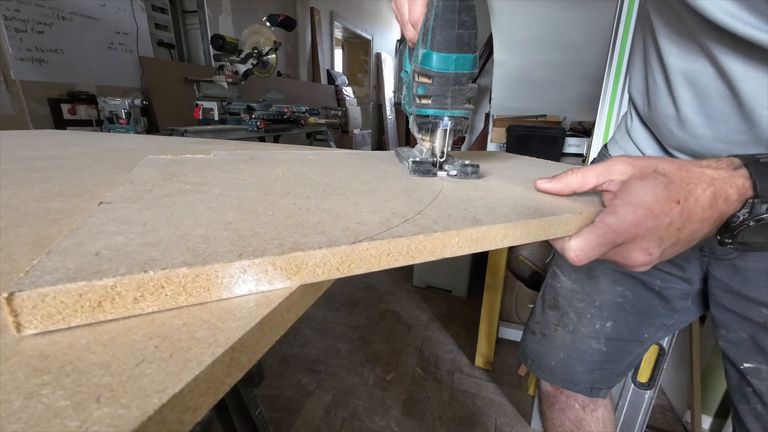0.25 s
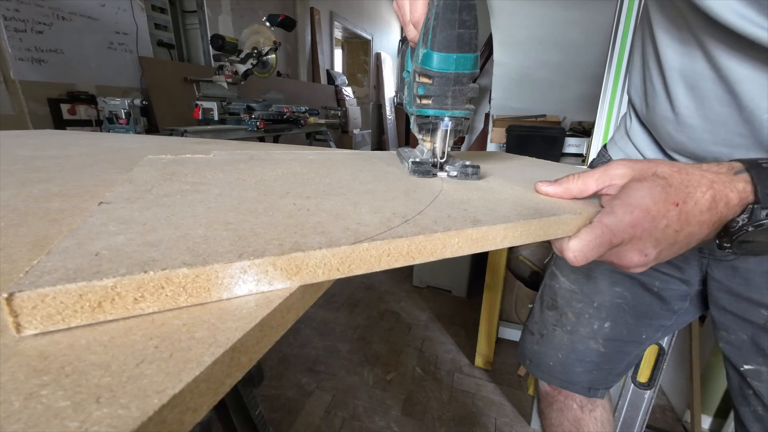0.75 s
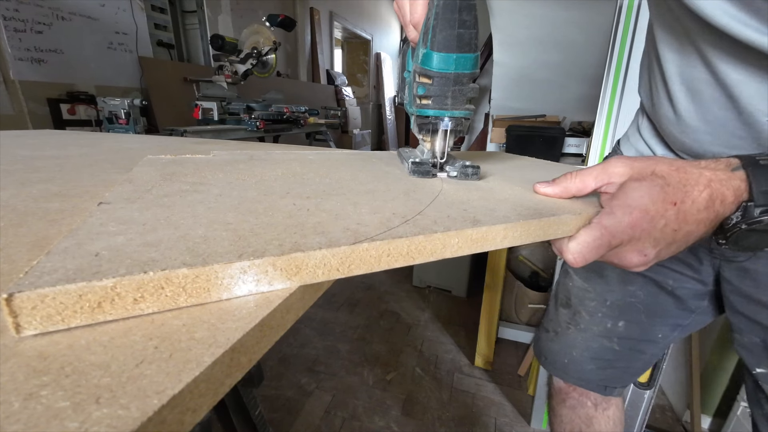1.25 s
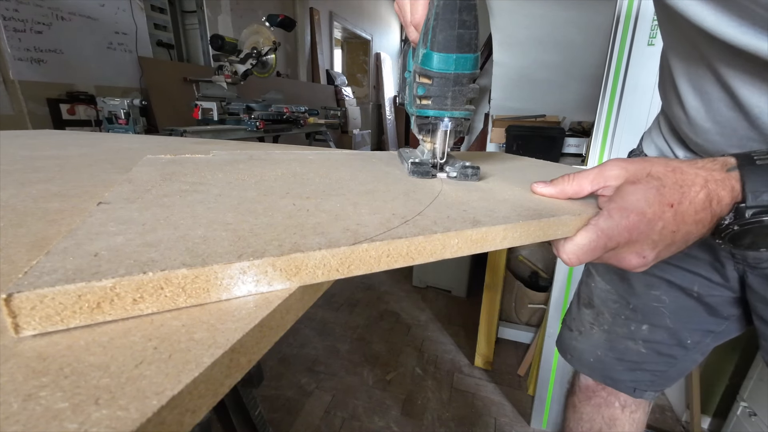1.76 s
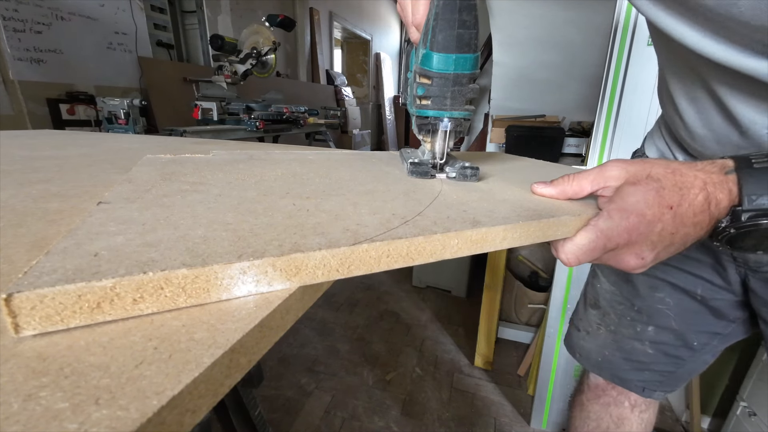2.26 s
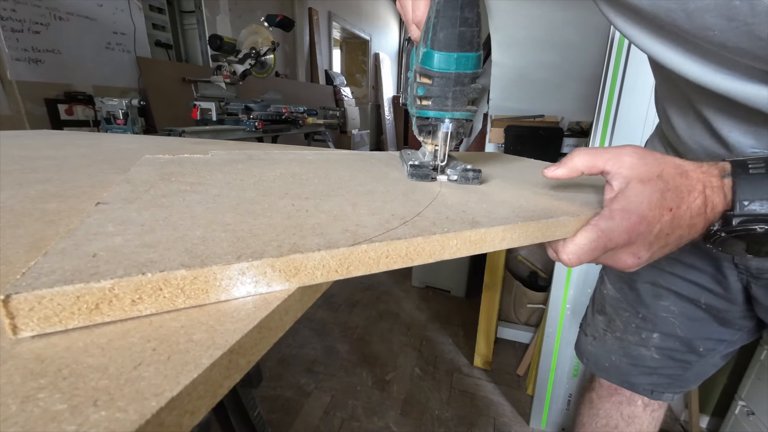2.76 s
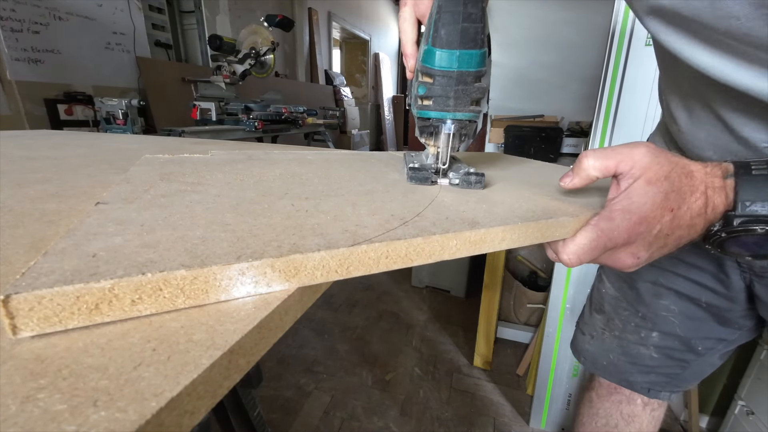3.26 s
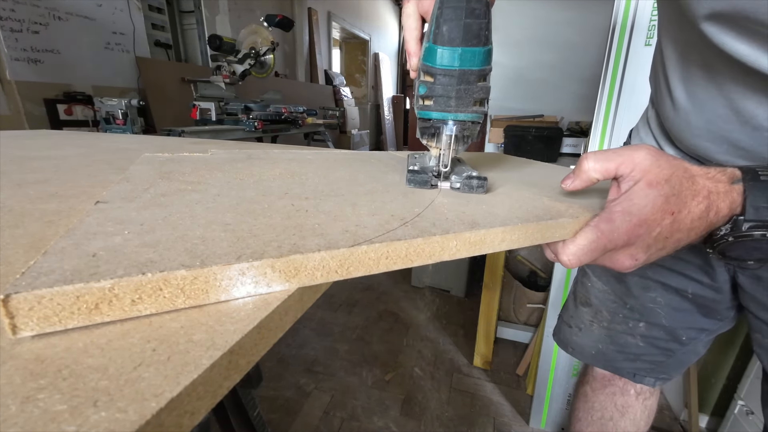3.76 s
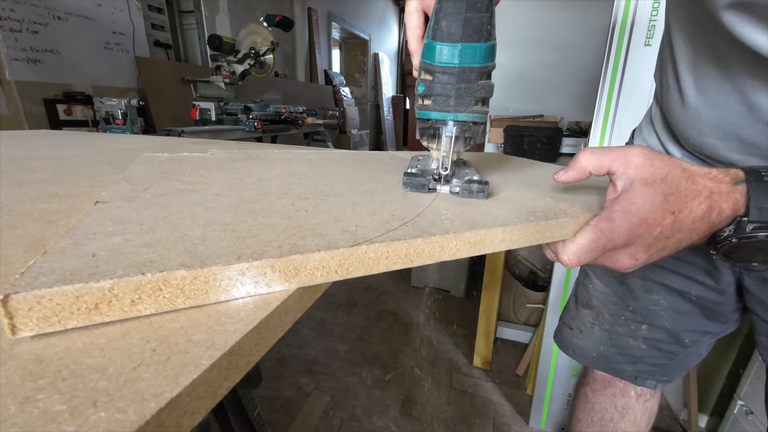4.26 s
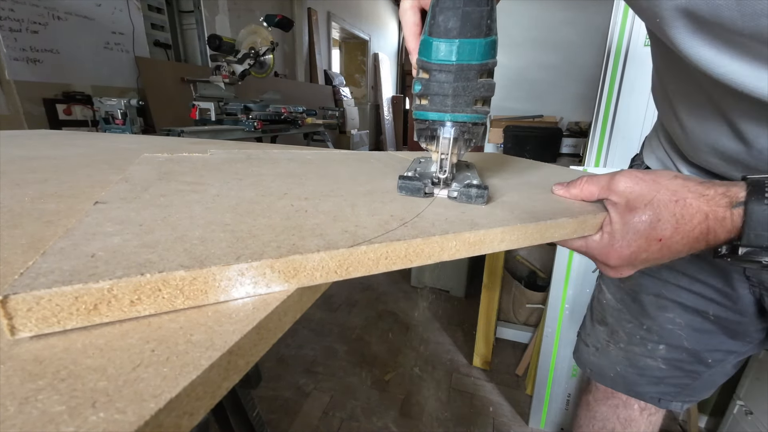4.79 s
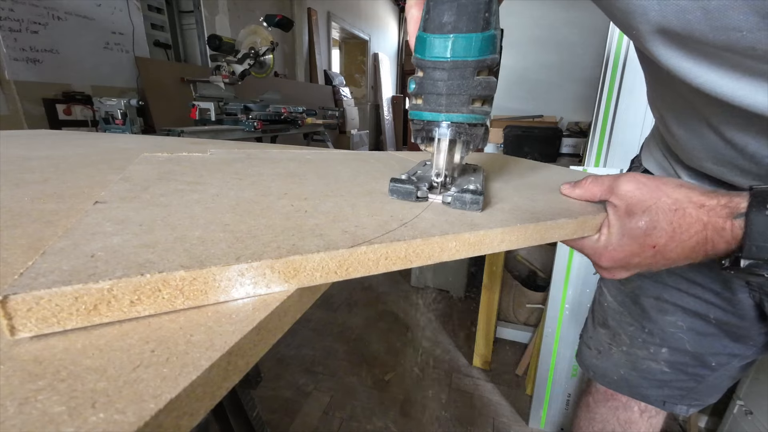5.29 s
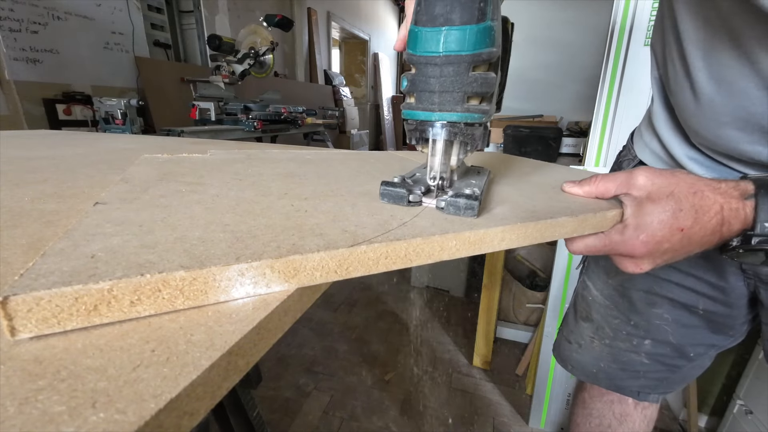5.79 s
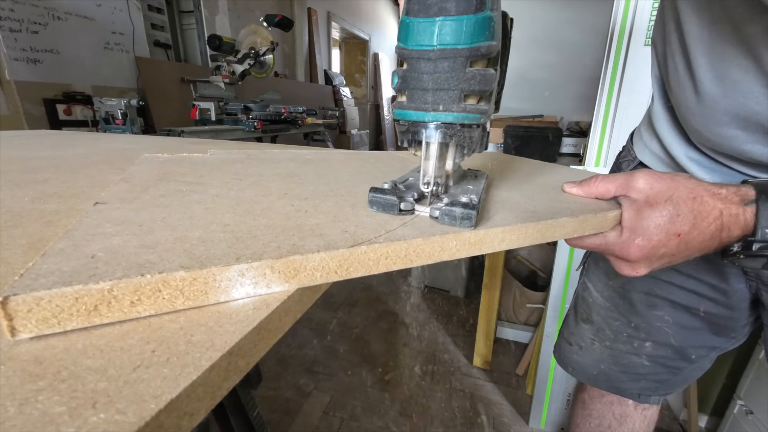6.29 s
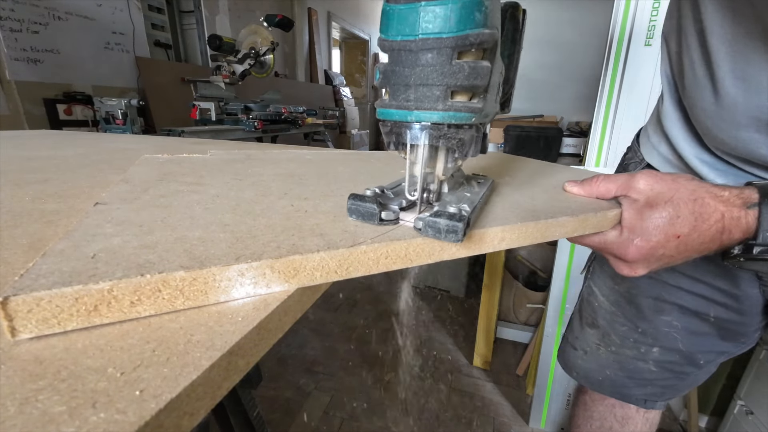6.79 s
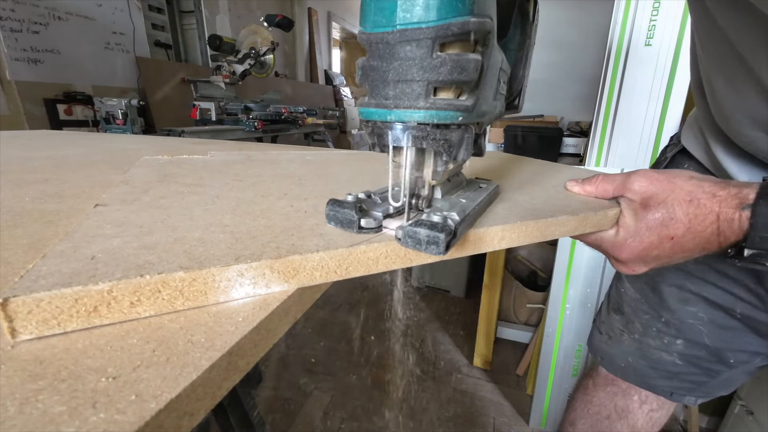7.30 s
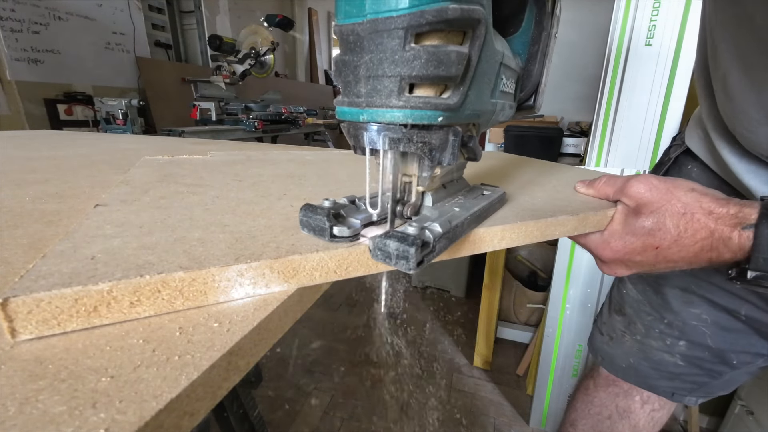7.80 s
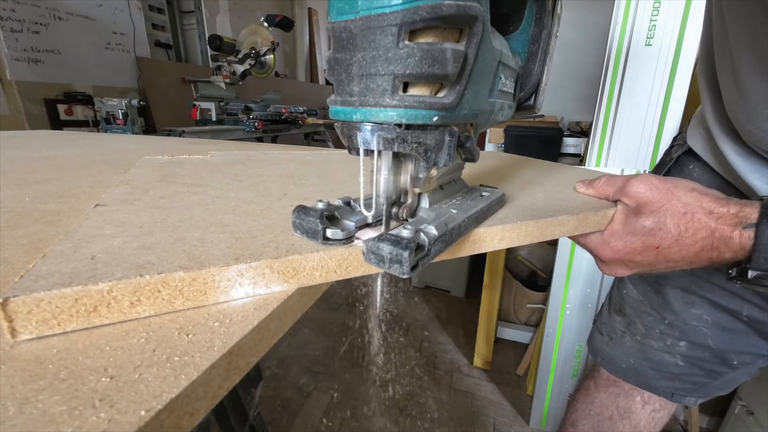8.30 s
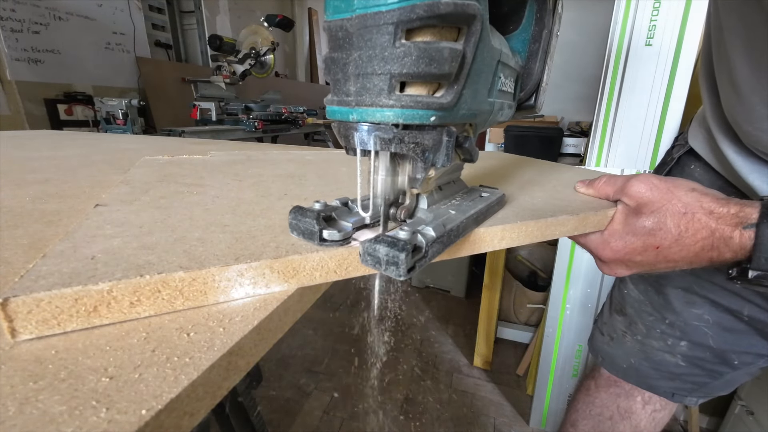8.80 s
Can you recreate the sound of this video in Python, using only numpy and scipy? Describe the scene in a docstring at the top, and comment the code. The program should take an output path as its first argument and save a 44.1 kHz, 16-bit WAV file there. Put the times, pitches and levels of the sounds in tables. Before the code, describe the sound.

Close-up power saw cutting board: trigger click, loud rasping chatter, a fast-motion whining stretch about three octaves higher, then natural-speed rattling again.

```python
"""A cordless jigsaw cuts a curve through thick chipboard in a workshop, close by.
A hand clicks the trigger; each stroke then shakes the board (hum), knocks in the drive and rasps in the kerf (noise).
The middle of the cut passes in fast motion, about eight times as fast: a whine of sines over hiss, with soft moans.
Until the edge, single overtones swell and fade as the saw travels over the board.
At the edge the saw is back at its natural pace and its overtones hold nearly steady."""
import sys
import numpy as np
from scipy import signal
from scipy.fft import rfft, irfft, next_fast_len
from scipy.io import wavfile
from scipy.ndimage import uniform_filter1d, map_coordinates

SR = 44100
rng = np.random.default_rng(int(sys.argv[2]) if len(sys.argv) > 2 else 0)


def master(y):
    """Save y as 16-bit WAV."""
    cut = np.clip(np.atleast_2d(y).T, -1, 1)
    pcm = np.round(cut * 32767)  # scale
    wavfile.write(sys.argv[1], SR, pcm.astype(np.int16))


N = 399105

# stretches of the cut: (start_s, end_s)
START_S, FAST_S, EDGE_S = (.149, 2.302), (2.298, 7.902), (7.9, 9.06)


def sawing(span_s, speed, force, steady, knocks, tone, rise_s, overtones_db, clatter_db, rumble_db,
           rasp_db, scatter_db):
    """The saw at its natural pace: hum of the shaken board, clatter of the strokes and a low rumble."""
    # rumble spectrum: freq_hz, relative density_db
    rumble_tone = [(15, -5), (150, -2), (400, -3), (900, -17), (4000, -50)]
    # resonances of housing, shoe and blade: freq_hz, width_hz, lift_db
    saw_modes = [(2210, 140, 1), (3580, 400, 2.5), (5510, 1120, 6), (7980, 1200, 2.5), (10040, 750, 4.5),
                 (11270, 1270, 6), (14800, 1200, 3.5)]
    # stereo width: freq_hz, nominal side_minus_mid_db
    width = [(60, -21), (110, -13), (200, -30), (600, -21.5), (2500, -81.5), (8100, -9.5), (15000, -6.5)]
    t = times(span_s)
    turns = np.cumsum(follow(speed, t)[0]) / SR + .005 * drift(t, 25)
    shake_db, cut_db = follow(force, t)
    board = hum(t, turns, steady, waver_db=1.0, waver_rate_hz=7)

    # an even comb of weak multiples between the strong ones
    strong = [round(order) for order, _ in steady]
    weak = [(order, 0) for order in range(6, 33) if order not in strong]
    comb = stack(t, turns, weak, waver_db=2.5, waver_rate_hz=3.7)
    board += amp(shake_db + overtones_db) * comb

    strokes = clatter(t, turns, knocks, rasp_db, scatter_db)
    strokes = colour(strokes, tone, flatten=True)
    strokes = unit(resonances(strokes, saw_modes))
    strokes *= amp(cut_db + clatter_db) * effort(t, turns)

    rumble = unit(colour(rng.standard_normal(len(t)), rumble_tone))
    rumble *= amp(shake_db + rumble_db)
    return spread((board + strokes + rumble) * faded(t, rise_s, 0.013), width)


def clatter(t, turns, knocks, rasp_db, scatter_db, jitter_s=.00005, snap_s=0.00056, ring_s=0.01, ring_db=-4):
    """Each knock excites the same noise burst on every stroke, at varying strength; chip noise follows the blows."""
    lag_s = np.arange(SR // 20) / SR
    rings, blows = np.zeros(len(t)), np.zeros(len(t))
    for place, db in knocks:
        at = np.flatnonzero(np.diff(np.floor(turns - place)) > 0)
        late, size = rng.standard_normal((len(at), 2)).T
        at = np.clip(at + np.round(late * jitter_s * SR).astype(int), 0, len(t) - 1)
        train = np.zeros(len(t))
        train[at] = amp(db + scatter_db * size)
        # metal snaps briefly and brightly; the board rings on lower down
        metal, wood = rng.standard_normal((2, len(lag_s)))
        wood = colour(wood, [(1500, 3.5), (3500, 12), (7000, -3), (14000, -20)])
        body = metal * np.exp(-lag_s / snap_s)
        body += amp(ring_db) * wood * np.exp(-lag_s / ring_s)
        rings += signal.fftconvolve(train, body)[:len(t)]
        blows += train
    bite = unit(signal.fftconvolve(blows, np.exp(-lag_s / 0.0016))[:len(t)])
    chips, dust = rng.standard_normal((2, len(t)))
    dust = colour(dust, [(2500, 7), (5000, -0.5), (9000, -2)])
    return unit(rings) + amp(rasp_db) * unit(chips * bite + 1.19 * dust)


def effort(t, turns):
    """Clatter gain: the blade bites hardest mid-stroke, up and down; snagging teeth jolt the shoe on the board."""
    # jolts: peak_s, lift_db
    jolts = [(.181, 5.5), (.408, 3.5), (.498, 3.5)]
    mid_stroke_turns, jolt_s = .47, .004
    pulsing = 1 + .13 * np.cos(2 * np.pi * 2 * (turns - mid_stroke_turns))
    return pulsing * amp(sum(db * swell(t, s, jolt_s) for s, db in jolts))


def hum(t, turns, steady, waver_db, waver_rate_hz):
    """Steady multiples of the stroke rate, plus any whose resonance peaks within this stretch as the saw travels."""
    # swells: stroke_rate_multiple (rounded in use), peak_s, half_length_s (to 1/e), peak_db
    swells = [(8, 0.28, 0.42, -37), (14, 0.39, 0.48, -32), (12, 1.06, 0.37, -41.5), (31, 1.6, 0.85, -42),
              (29, 1.7, 0.8, -32.5), (30, 1.7, .8, -37.5), (49, 1.7, 0.65, -33.5), (8.9, 2.36, 0.97, -36.5),
              (8.9, 2.3, 0.99, -34.5), (15.2, 3.06, 1, -43), (30, 3.6, 0.25, -31.5), (29, 3.92, 0.76, -36),
              (39, 3.85, .5, -43), (30, 4.1, 0.37, -37), (4, 4.25, 1.8, -43), (31, 4.1, 1.76, -38),
              (14, 3.95, 0.64, -42.5), (7, 4.2, 2.24, -33.5), (2, 5, 2.76, -41), (8.6, 5.16, 1.05, -39),
              (8, 5.47, 1.12, -36), (7, 5.65, 0.84, -33.5), (14, 6.3, 0.44, -37), (11, 6.28, 0.36, -42.5),
              (16, 6.2, .4, -42), (6, 6.4, 0.91, -44.5), (1, 6.47, 3.8, -44), (3, 6.83, 3.37, -37),
              (19, 6.7, 0.18, -38), (8, 7.42, 0.5, -42)]
    power = {round(order): amp(db) ** 2 for order, db in steady}
    for order, peak_s, half_s, db in swells:
        if t[0] < peak_s < t[-1]:
            # high multiples come and go more abruptly
            level = amp(db) * swell(t, peak_s, half_s, steepness=max(2, order // 3))
            power[round(order)] = power.get(round(order), 0) + level ** 2
    return sum(np.sqrt(p) * partial(t, turns, order, waver_db, waver_rate_hz) for order, p in power.items())


def stack(t, turns, orders, waver_db, waver_rate_hz):
    """Partials, rms 1 together; each steps to another level whenever the saw is steered anew."""
    # steering moments: time_s
    steers = [3.08, 3.35, 4.5, 5.63, 6.88]
    leg = np.searchsorted(steers, t)
    out = np.zeros(len(t))
    for order, db in orders:
        held = amp(db + rng.uniform(-5.2, 4.0, len(steers) + 1))[leg]
        smooth = uniform_filter1d(held, size=2048)
        out += smooth * partial(t, turns, order, waver_db, waver_rate_hz)
    return unit(out)


def partial(t, turns, order, waver_db, waver_rate_hz):
    """A sine at a multiple of the stroke rate, rms 1 before its level wavers."""
    sine = np.sin(2 * np.pi * (order * turns + rng.random()))
    return np.sqrt(2) * sine * amp(waver_db * drift(t, waver_rate_hz))


def fast_sawing():
    """Fast motion: the hum rises about three octaves to a whine, and fine hiss takes the place of the clatter."""
    # speed: time_s, strokes_per_s
    speed = [(2.3, 344.7), (2.45, 340.8), (2.99, 342.6), (3.33, 346.6), (3.5, 344.9), (4.41, 348.3),
             (4.44, 350.1), (4.64, 351.7), (4.92, 350.5), (5.53, 351.2), (5.61, 352.6), (6.34, 345.3),
             (6.79, 347.0), (6.93, 351.6), (7.09, 352.4), (7.29, 349.1), (7.85, 352.9), (7.9, 350.6)]
    # levels before each layer's offset: time_s, fine_hiss_db, coarse_buzz_db
    levels = [(2.34, -25.5, -30), (2.65, -25, -35), (4.38, -26, -30.5), (4.57, -24.5, -34.5),
              (5.48, -24, -34.5), (5.68, -25.5, -32.5), (6.43, -27.5, -29.5), (6.92, -26, -33.5),
              (7.14, -25, -33), (7.64, -26.5, -33), (7.86, -25.5, -30.5)]
    # steady whine: stroke_rate_multiple, level_db
    steady = [(4, -49), (5, -35.5), (7, -43.5), (9, -50), (12, -48)]
    # fine hiss spectrum: freq_hz, relative density_db
    hiss_tone = [(1000, -20), (2000, -7.5), (2800, -3), (3800, -6.5), (6500, -4), (8700, 2.5), (12000, 2.5),
                 (15500, 1.5)]
    # coarse noise spectrum: freq_hz, relative density_db
    grit_tone = [(900, -8.5), (2400, -18), (4000, -1), (6300, 5), (8500, -2), (14000, -7)]
    # stereo width: freq_hz, nominal side_minus_mid_db
    width = [(150, -13.5), (400, -18.5), (2400, -60), (12000, -55)]
    t = times(FAST_S)
    turns = np.cumsum(follow(speed, t)[0]) / SR + 0.0025 * drift(t, 45)
    hiss_db, buzz_db = follow(levels, t)
    whine = hum(t, turns, steady, waver_db=0.9, waver_rate_hz=20)

    middle, top = np.arange(10, 22), np.arange(22, 45)
    buzz = stack(t, turns, [(order, 0) for order in middle], waver_db=2.0, waver_rate_hz=6)
    buzz *= amp(buzz_db - 5.0)
    fizz = stack(t, turns, zip(top, -.2 * top), waver_db=2, waver_rate_hz=8)
    fizz *= amp(hiss_db - 8.5)

    # the motor is geared out of step with the blade: a weaker line just above each order
    geared = np.arange(7, 22)
    motor_lines = zip(geared + .29, -6 * np.log(geared))
    motor = amp(-42.0) * stack(t, turns, motor_lines, waver_db=5.0, waver_rate_hz=6.6)

    throb = (1 + 0.15 * np.cos(2 * np.pi * turns)) * amp(0.88 * drift(t, 60))
    fine, coarse, low = rng.standard_normal((3, len(t))) * throb
    hiss = amp(hiss_db - 0.8) * unit(colour(fine, hiss_tone))
    hiss += amp(buzz_db - 4.5) * unit(colour(coarse, grit_tone))

    # the board's own murmur swells as the saw comes nearer
    murmur = unit(colour(low, [(25, -1.5), (150, -0.5), (1200, 0), (3000, -8.0), (9000, -16.0)]))
    murmur *= amp(np.interp(t, [2.3, 5.5], [-50, -45]))
    sound = whine + buzz + fizz + motor + hiss + rasps(t, turns) + murmur
    return (spread(sound, width) + ports(whine)) * faded(t, 0.0018, 0.0021)


def rasps(t, turns, depth=0.59):
    """Narrow bands of chip noise that pulse with the strokes, swell and fade."""
    # rough bands: peak_s, half_length_s (to 1/e), centre_hz, width_hz, level_db (before the pulsing)
    bands = [(5.13, 0.65, 2930, 890, -41.5), (5.08, 0.64, 9600, 3000, -34.5),
             (7.04, 0.55, 6700, 820, -40.5), (3.87, 0.51, 13800, 1300, -37), (3.9, 0.96, 10300, 540, -39.5)]
    out = np.zeros(len(t))
    for peak_s, half_s, hz, width_hz, db in bands:
        noise = band(len(t), hz, width_hz, order=3)
        out += amp(db) * swell(t, peak_s, half_s, steepness=10) * noise
    return out * (1 + depth * np.cos(2 * np.pi * turns))


def ports(x):
    """Two microphone ports hear the whine out of step: a quarter-cycle offset, opposite in the two channels."""
    # offset: freq_hz, side_minus_mid_db
    port_offset = [(380, -34), (700, -9.5), (1100, -13.5), (1700, -48)]
    quarter = signal.hilbert(x, next_fast_len(len(x))).imag[:len(x)]
    offset = colour(quarter, port_offset)
    return np.array([offset, -offset])


def moans():
    """Short soft sines that glide a little, under the whine."""
    # moans: start_s, length_s, start_hz, end_hz, peak_db (rms at the crest)
    glides = [(3.58, 0.21, 418, 470, -52), (4.14, 0.21, 474, 486, -45), (4.818, .2, 413, 385, -47)]
    out = np.zeros((2, N))
    for s, length_s, from_hz, to_hz, db in glides:
        t = times((0, length_s))
        turns = np.cumsum(np.linspace(from_hz, to_hz, len(t))) / SR + 0.048 * drift(t, 47)
        add(out, s, amp(db) * np.sqrt(2) * np.sin(2 * np.pi * turns) * np.hanning(len(t)))
    return out


def handling():
    """Decaying noise bands: a hollow knock, a faint ring and small clicks as the hand takes up the trigger."""
    # clicks: start_s, level_db (before halving), centre_hz, width_hz, decay_s
    clicks = [(0.02, -30, 620, 300, 0.0077), (.02, -38, 2800, 3500, .006), (.021, -56, 1880, 70, .14),
              (0.07, -40.5, 3000, 5000, 0.0065), (.078, -48, 400, 200, 0.015)]
    out, lag_s = np.zeros((2, N)), np.arange(SR // 2) / SR
    for s, db, hz, width_hz, decay_s in clicks:
        add(out, s, amp(db) * band(len(lag_s), hz, width_hz, order=2) * np.exp(-lag_s / decay_s) / 2)
    return out


def room_tone():
    """Steady coloured noise of the quiet workshop, alike in both channels."""
    # spectrum: freq_hz, relative density_db
    tone = [(30, -8), (300, -1), (900, -11), (5000, -20), (15000, -22)]
    return amp(-58) * unit(colour(rng.standard_normal(N), tone))


def spread(x, width):
    """Diffuse reflections from bench and walls reach the two sides with unrelated phases."""
    z = signal.stft(x, nperseg=512)[2]
    scrambled = z * np.exp(2j * np.pi * rng.random(z.shape))
    # doubling offsets the level lost between scrambled frames
    diffuse = 2 * signal.istft(scrambled)[1][:len(x)]
    side = colour(diffuse, width)
    return np.array([x + side, x - side])


def resonances(x, modes):
    """Lifts a bell-shaped band around each mode."""
    hz = np.geomspace(1000, SR / 2, num=300)
    db = np.zeros(len(hz))
    for mode_hz, width_hz, lift_db in modes:
        db += lift_db / (1 + (2 * (hz - mode_hz) / width_hz) ** 4)
    return colour(x, np.column_stack([hz, db]))


def band(count, hz, width_hz, order):
    """Noise in one resonance, rms 1; a higher order steepens its skirts."""
    size = next_fast_len(count)
    off = 2 * (np.fft.rfftfreq(size, 1 / SR) - hz) / width_hz
    spectrum = rfft(rng.standard_normal(size)) / np.sqrt(1 + off ** (2 * order))
    return unit(irfft(spectrum, size)[:count])


def colour(x, points, flatten=False):
    """Filters by a (Hz, dB) spectrum, optionally after evening out the broad ripples of x."""
    size = next_fast_len(len(x) + 2048)
    z, hz = rfft(x, size), np.fft.rfftfreq(size, 1 / SR)
    if flatten:
        z = z / np.sqrt(uniform_filter1d(abs(z) ** 2, size=size // 200) + 1e-12)
    f, db = np.transpose(points)
    gain = amp(np.interp(np.log(hz + 1), np.log(f + 1), db))
    return irfft(z * gain, size)[:len(x)]


def drift(t, rate_hz):
    """Smooth random curve of rms about 1: a spline through rate_hz random knots a second."""
    knots = rng.standard_normal(4096)
    coarse = t[::32]
    return np.interp(t, coarse, map_coordinates(knots, [coarse * rate_hz], order=3, mode="wrap"))


def swell(t, peak_s, half_s, steepness=2):
    """A bell-shaped rise and fall, 1 at its peak; more steepness flattens the top."""
    return np.exp(-abs((t - peak_s) / half_s) ** steepness)


def faded(t, rise_s, fall_s):
    """Linear fade in and out of a stretch."""
    return np.clip((t - t[0]) / rise_s, 0, 1) * np.clip((t[-1] - t) / fall_s, 0, 1)


def amp(db):
    """Decibels to gain."""
    return 10 ** (np.asarray(db) / 20)


def unit(x):
    """Scales to rms 1."""
    return x / np.sqrt(np.mean(x ** 2) + 1e-20)


def times(span_s):
    """Sample times of a stretch, in seconds."""
    return np.arange(round(span_s[0] * SR), round(span_s[1] * SR)) / SR


def follow(rows, t):
    """The columns of a curve table, interpolated at the times t."""
    s, *columns = np.transpose(rows)
    return [np.interp(t, s, c) for c in columns]


def add(mix, s, sound):
    """Mixes a sound in at time s."""
    part = mix[:, round(s * SR):][:, :sound.shape[-1]]
    part += sound[..., :part.shape[1]]


def scene():
    """The quiet workshop, the trigger and the three stretches of the cut."""
    # blade speed, sagging under load: time_s, strokes_per_s
    speed_in = [(.17, 43.9), (.37, 44.35), (.75, 43.65), (1.2, 43.48), (1.6, 43.54), (2.28, 43.15)]
    speed_out = [(7.92, 43.83), (8.65, 43.96), (9.03, 43.78)]
    # force, before each layer's offset: time_s, board_shake_db, clatter_db
    force_in = [(0.15, -24.5, -16.5), (0.7, -32, -18), (0.8, -29, -19.5), (1.6, -27, -18),
                (2.3, -24.5, -19)]
    force_out = [(7.9, -29.5, -17.5), (9.05, -27, -18)]
    # steady hum of the shaken board: stroke_rate_multiple, level_db
    hum_in = [(1, -52), (2, -47.5), (3, -50), (4, -40), (5, -32.5), (8, -40.5), (10, -43.5), (19, -40),
              (23, -40.5)]
    hum_out = [(1, -41.5), (2, -41), (3, -33.5), (4, -46), (5, -34), (7, -38.5), (8, -41.5), (12, -39),
               (13, -41.5), (19, -40.5), (33, -34.5), (50, -35), (51, -35)]
    # knocks of drive and shoe within a stroke: place_turns, relative level_db
    knocks_in = [(.07, -3.5), (.42, -9), (.56, -3), (.88, -2)]
    knocks_out = [(.06, 1.5), (0.611, -4), (.77, 2.5), (.87, -1)]
    # colour of saw and board, before the resonances: freq_hz, relative density_db
    tone_in = [(210, -33), (350, -7.5), (620, -4), (1800, -2), (3000, -2), (4400, -7.5), (6500, -9),
               (9000, -16), (11500, -16.5), (13000, -23), (15800, -32)]
    tone_out = [(210, -24), (350, -10), (600, -9.5), (770, -1.5), (2400, -0.5), (4100, -4), (6000, -6),
                (9000, -11.5), (11500, -13.5), (12500, -15), (15800, -24)]
    mix = handling() + moans() + room_tone()
    first_cut = sawing(START_S, speed_in, force_in, hum_in, knocks_in, tone_in, rise_s=0.0071,
                       overtones_db=-6.0, clatter_db=1.18, rumble_db=-16.5, rasp_db=2.3, scatter_db=1.36)
    near_edge = sawing(EDGE_S, speed_out, force_out, hum_out, knocks_out, tone_out, rise_s=0.00056,
                       overtones_db=-7.5, clatter_db=0.92, rumble_db=-10.5, rasp_db=6.5, scatter_db=0.5)
    add(mix, START_S[0], first_cut)
    add(mix, FAST_S[0], fast_sawing())
    add(mix, EDGE_S[0], near_edge)
    return mix


def record(dry):
    """Rounds the highest peaks softly and limits the band."""
    cutoff_hz = 15850
    rounded = dry / (1 + dry ** 4) ** .25
    lowpass = signal.firwin(1023, cutoff_hz, window=("kaiser", 9), fs=SR)
    return signal.oaconvolve(rounded, lowpass[None], "same", axes=1)


dry = scene()
out = record(dry)
master(out)
```